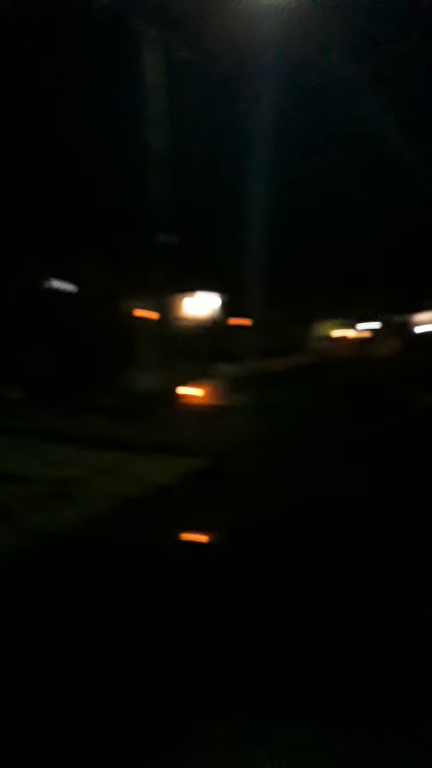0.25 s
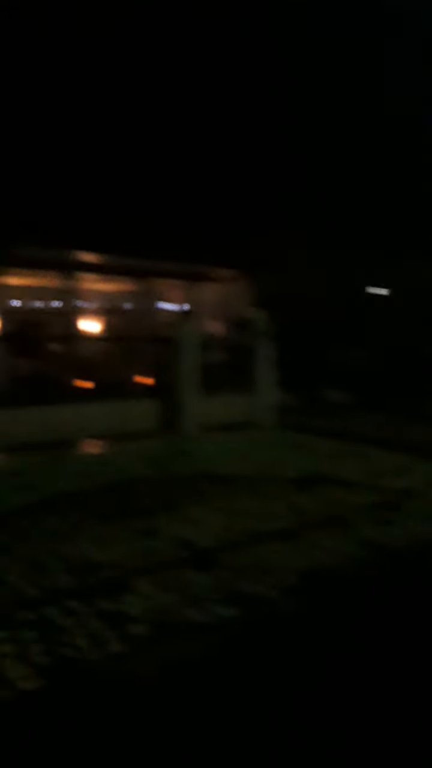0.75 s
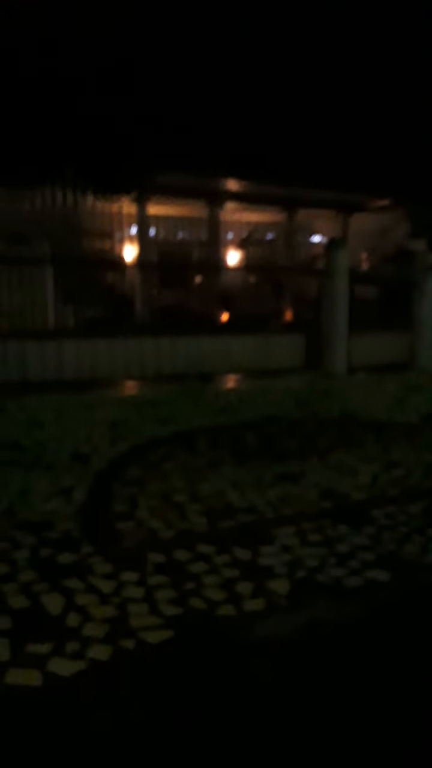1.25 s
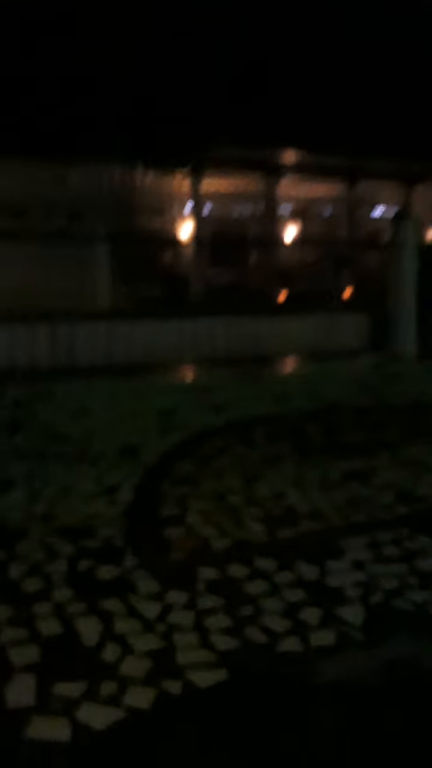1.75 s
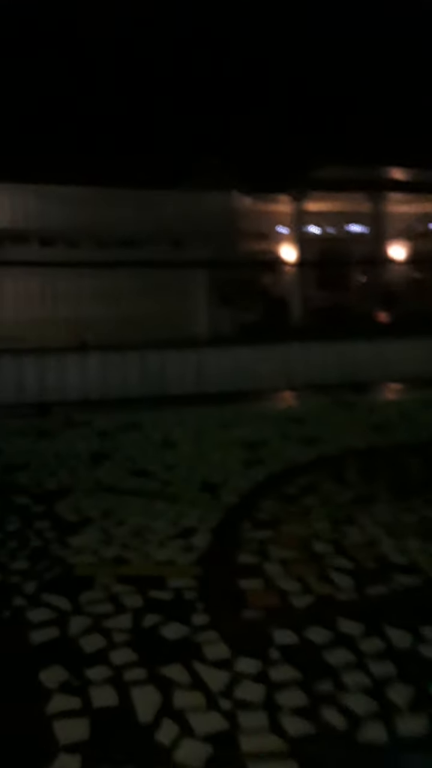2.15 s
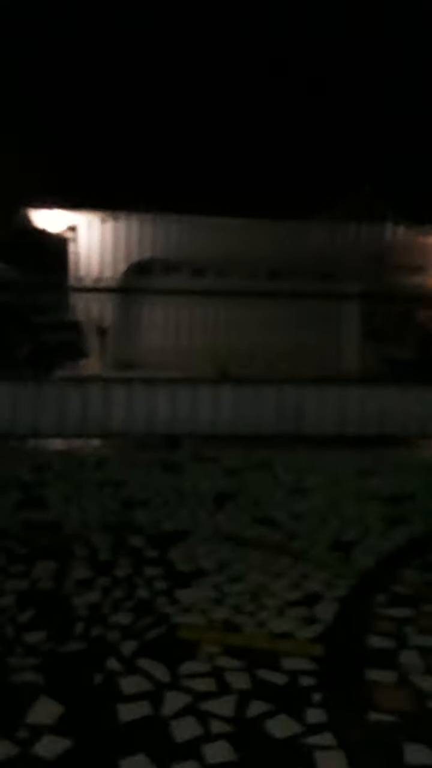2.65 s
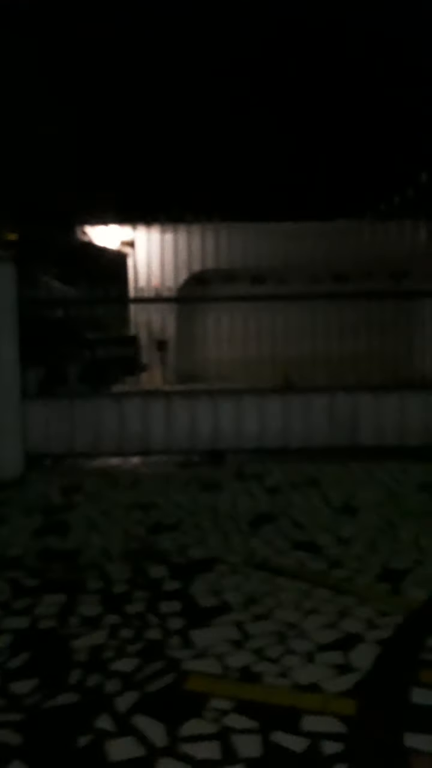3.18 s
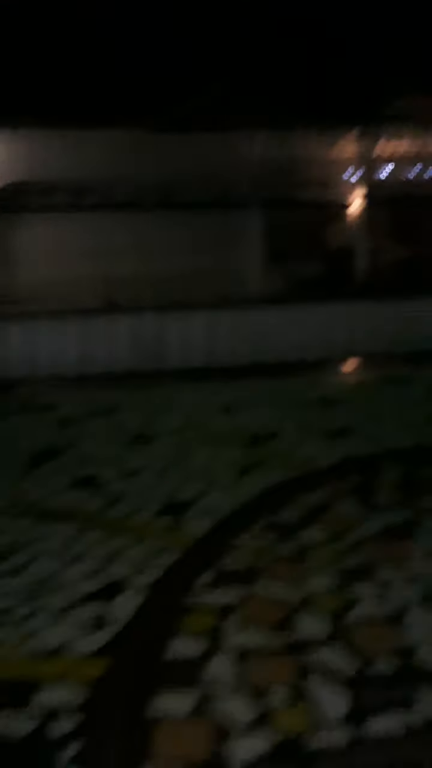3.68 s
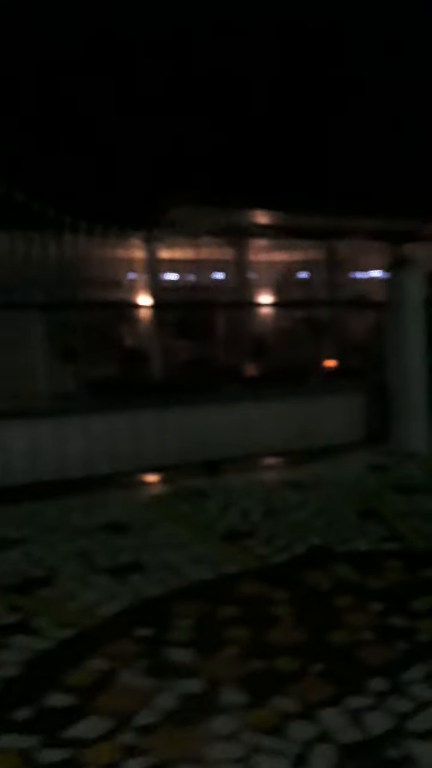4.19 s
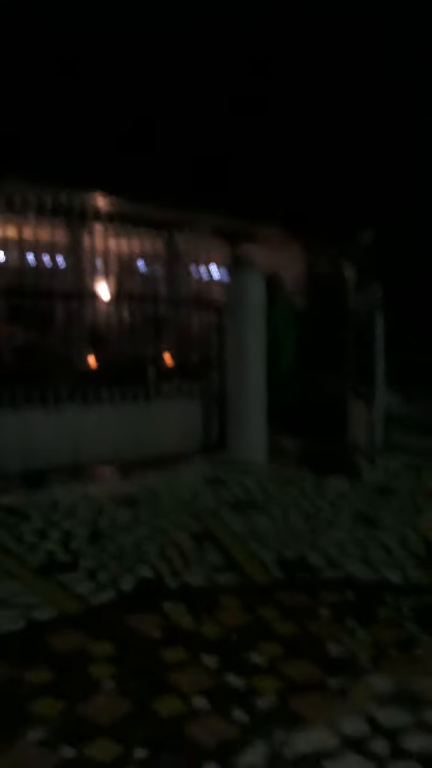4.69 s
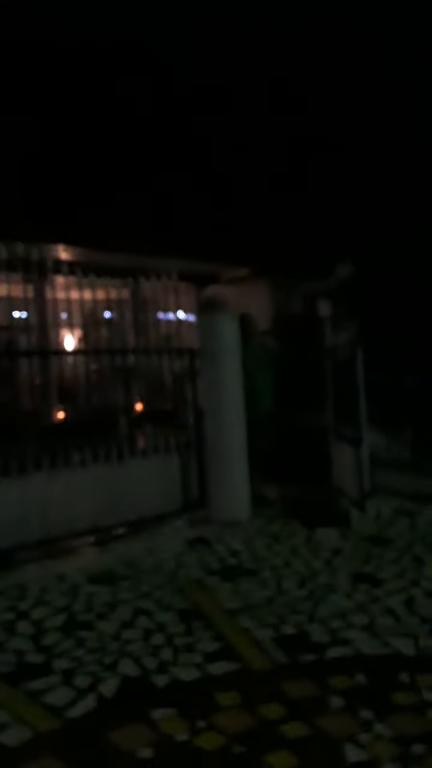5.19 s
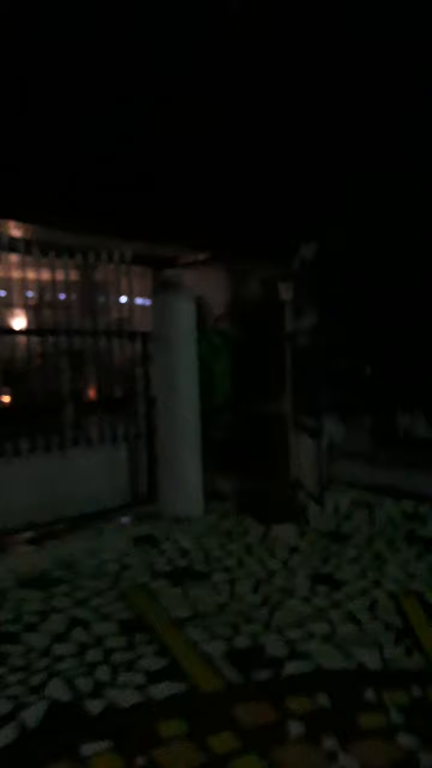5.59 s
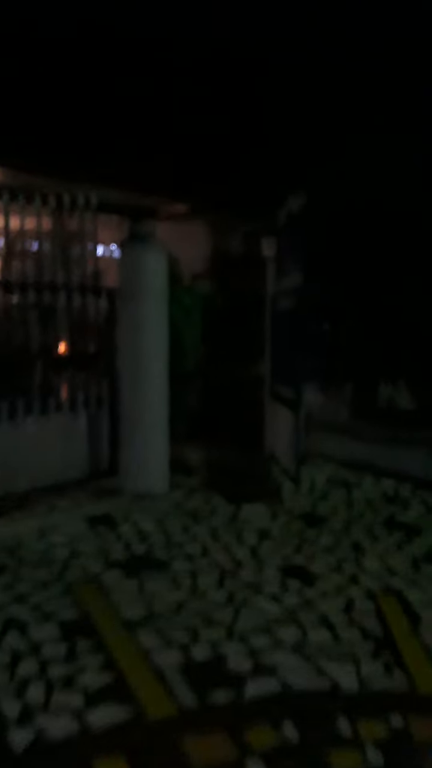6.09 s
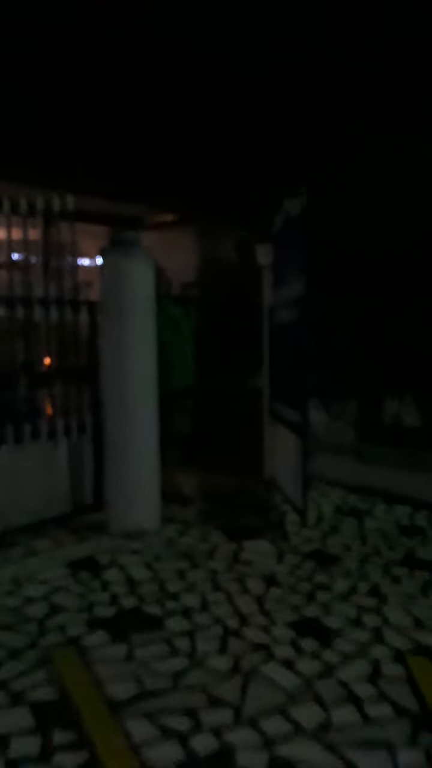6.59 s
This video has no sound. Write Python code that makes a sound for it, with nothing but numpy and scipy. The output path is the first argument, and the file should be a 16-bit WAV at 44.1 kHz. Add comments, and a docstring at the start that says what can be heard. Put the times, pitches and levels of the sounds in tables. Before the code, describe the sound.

Frogs whistle throughout on a paved square at night, several short, high, rising calls a second, often overlapping and sometimes breaking into a peep. Five firecrackers go off down the street at about 0.2, 1.9, 4.0, 4.8 and 6.1 seconds. They are by far the loudest sounds, each a sharp bang with quick slaps off house fronts and an echo fading within about a second; the last two are slightly weaker. Near the phone microphone, grit cracks under shifting shoes and cloth rustles, with brief sole scrapes around 2.5, 4.4 and 5.7 seconds. A faint cricket trills in phrases, other insects buzz very high, and distant traffic hums quietly underneath. A light breeze brushes the microphone now and then, and soft, dull knocks come at about 3.1, 6.0 and 6.5 seconds.

```python
"""A paved square at night, with far traffic humming under everything.
Frogs whistle in rising sweeps. A cricket trills, and a far insect choir and a katydid buzz.
The person holding the phone shifts on gritty stones: grit cracks, soles scrape, cloth rustles.
Firecrackers go off down the street, each a sharp push of air that echoes between the house fronts.
A breeze touches the microphone, and there are a few soft, dull knocks."""
import sys
import numpy as np
from scipy import signal
from scipy.io import wavfile
from scipy.ndimage import uniform_filter1d

SR = 44100
rng = np.random.default_rng(int(sys.argv[2]) if len(sys.argv) > 2 else 0)


def pcm_store(signal):
    """Save signal as 16-bit PCM."""
    levels = np.round(np.clip(np.atleast_2d(signal), -1, 1) * 32767)
    wavfile.write(sys.argv[1], SR, levels.astype(np.int16).T)


N = 301644
TIME = np.arange(N) / SR

# The tone of far traffic. Each row: pitch in Hz, relative strength there in dB.
TRAFFIC_TONE = [(30, -11), (80, 1), (160, 0.5), (500, 1), (900, -0.5), (1400, -7), (3200, -12),
                (5500, -20.5), (8000, -46), (10500, -57), (15000, -35)]
# Cricket phrases. Each row: start in seconds, level in dB.
CRICKET_PHRASES = [(.53, -63), (.87, -80), (1.28, -64), (1.668, -64.5), (2.15, -58), (2.86, -66),
                   (3.28, -63), (3.66, -67), (5.15, -69), (5.5, -62), (5.88, -65), (6.28, -63),
                   (6.7, -58.5)]
# Bouts of crackly hiss: shoes and cloth rustling, and the fizz after the second bang.
# Each row: start in seconds, hold in seconds, level in dB.
CRACKLE_BOUTS = [(-.01, 0.1, -68), (.65, 0.16, -77.5), (1.0, 0.39, -72.5), (1.36, 0.12, -67.5),
                 (1.89, 0.12, -66), (2.465, 0.06, -56), (3.063, 0.17, -65.5), (3.87, 0.12, -66.5),
                 (4.33, 0.08, -76), (4.405, 0.016, -54.5), (4.945, 0.27, -77.5), (5.04, 0.033, -66),
                 (5.61, 0.19, -64), (6.22, 0.16, -63), (6.8, .1, -63.5)]
# The tone of that hiss. Each row: band centre in Hz, width in Hz, relative level in dB.
CRACKLE_BANDS = [(1180, 1160, 8.5), (3520, 3150, 12), (7550, 3300, 5.5), (14300, 3400, -0.5)]
# Frog whistles. Each row: middle of the glide in seconds, seconds from there to the top, level in dB.
FROG_WHISTLES = [(.005, 0.12, -42.5), (.035, 0.14, -45), (.406, 0.097, -39.5), (.45, .1, -44.5),
                 (.713, 0.11, -31.5), (.742, .11, -40.5), (0.765, 0.13, -40), (1.091, 0.091, -34.5),
                 (1.098, 0.089, -38), (1.441, 0.12, -32), (1.467, 0.097, -39), (1.595, 0.096, -49.5),
                 (1.823, 0.095, -39), (2.164, .11, -40), (2.293, 0.1, -45.5), (2.362, .11, -34),
                 (2.431, 0.098, -36), (2.766, 0.099, -38), (2.798, 0.11, -40), (3.092, 0.11, -30.5),
                 (3.113, 0.097, -37), (3.485, 0.11, -39), (3.519, 0.11, -37.5), (3.9, 0.098, -33.5),
                 (4.163, 0.12, -33.5), (4.257, 0.12, -46.5), (4.577, 0.1, -41.5), (4.977, 0.11, -38),
                 (5.112, 0.12, -53), (5.31, 0.092, -41.5), (5.328, 0.081, -45), (5.678, 0.13, -41),
                 (5.949, 0.086, -45.5), (5.976, 0.1, -42), (6.297, 0.092, -37), (6.311, 0.086, -37),
                 (6.551, 0.11, -35.5), (6.793, 0.095, -42), (6.815, 0.096, -41)]
# Short high notes that some whistles break into. Each row: start in seconds, level in dB.
FROG_PEEPS = [(1.522, -42), (2.4473, -44), (3.184, -46), (4.247, -46), (5.067, -45)]
# Grit cracking under shoes. Each row: start in seconds, peak in dB, band centre in Hz.
GRIT_CRACKS = [(0.0187, -28.5, 3560), (.045, -39, 11000), (0.0747, -34, 9000), (0.6562, -32, 3450),
               (.7174, -42, 12500), (0.835, -30.5, 1630), (1.0989, -32, 2550), (1.2245, -34.5, 4150),
               (1.3676, -29, 3120), (1.394, -25.5, 3700), (1.482, -28.5, 6400), (1.5201, -24, 3150),
               (1.924, -33, 12500), (2.0525, -31, 3980), (2.177, -33, 5000), (2.409, -50, 10000),
               (2.4723, -33, 4500), (3.218, -26, 3100), (3.8741, -31, 3500), (4.333, -47, 11500),
               (4.4812, -27, 4260), (5.052, -32.5, 6000), (5.094, -33.5, 8000), (5.347, -50, 8500),
               (5.5745, -48, 12000), (5.7583, -36, 3420), (5.8985, -46, 9000), (6.2226, -24, 6450),
               (6.266, -24, 3740), (6.322, -24.5, 3340)]
# Soles scraping. Each row: start in seconds, length in seconds, level in dB, band centre in Hz.
SOLE_SCRAPES = [(0.082, 0.017, -33.5, 2140), (2.499, 0.051, -38.5, 3300), (3.134, 0.037, -46, 6900),
                (3.868, 0.046, -44.5, 3350), (4.418, 0.019, -28, 2760), (5.661, 0.014, -37.5, 3720),
                (5.674, 0.026, -28.5, 4630), (5.692, 0.046, -36, 3640)]
# Firecrackers. Each row: start in seconds, shock level in dB, suction depth from 0 to 1,
# shock length in milliseconds, paper crack level in dB, its centre in Hz, street roar level in dB,
# roar tilt in dB per octave, seconds until the near house front answers, seconds until the far one does.
FIRECRACKERS = [(.2326, -1.2, .55, 1.55, -7, 4000, -35, -1.5, .039, .062),
                (1.8989, -.3, .8, 1.15, -20, 6500, -32.5, 1.2, .034, .063),
                (4.0091, -1.5, .5, 1.05, -13, 7400, -34, 0, .032, .061),
                (4.796, -4.5, .55, 1.45, -15, 5300, -35.5, 0, .029, .06),
                (6.1025, -4.6, .6, 1.3, -19, 7000, -35, .8, .029, .056)]
# The street's roar. Each row: band centre in Hz, relative level in dB, seconds to fade by 60 dB.
ROAR_BANDS = [(188.2, -6, 1), (418, -2.5, 1.27), (910, -4, 1.33), (2095, -4, 0.98), (5530, -19, 0.97)]
# Echoes off the near and the far house front.
# Each row: seconds after that front answers, dB above the roar level, pitch in Hz.
NEAR_ECHOES = [(-.007, 4, 600), (.0005, 15, 457)]
FAR_ECHOES = [(.0005, 15, 620), (.007, 14, 450), (.021, 13, 700)]
# Katydid songs. Each row: start in seconds, end in seconds, level in dB.
KATYDID_SONGS = [(0.985, 1.589, -62), (2.07, 2.45, -68), (2.707, 3.33, -55), (4.636, 4.852, -56),
                 (6.194, 6.65, -53)]
# Gusts of breeze. Each row: start in seconds, end in seconds, level in dB.
GUSTS = [(1.22, 1.55, -52.5), (3.15, 3.8, -59), (4.2, 4.68, -53), (6.4, 6.9, -55.5)]
# Soft, dull knocks. Each row: start in seconds, level in dB, pitch in Hz.
DULL_KNOCKS = [(3.111, -38.5, 322), (5.973, -37, 305), (6.515, -31.5, 101)]


def from_db(db):
    """Turn decibels into a number to multiply by."""
    return 10 ** (np.asarray(db) / 20)


def unit_level(x):
    """Scale a sound to an average (rms) level of 1."""
    return x / np.sqrt(np.mean(x ** 2))


def band(x, hz, width):
    """Keep the pitches around hz, in a band width Hz wide."""
    low = np.sqrt(hz ** 2 + width ** 2 / 4) - width / 2
    return keep_between(x, low, min(low + width, .45 * SR), order=2)


def keep_between(x, low_hz, high_hz, order):
    """Keep the pitches between two edges; a higher order cuts more steeply."""
    return signal.sosfilt(signal.butter(order, [low_hz, high_hz], "band", fs=SR, output="sos"), x)


def hiss(hz, width, size=N):
    """A band of noise at level 1."""
    return unit_level(band(rng.standard_normal(size), hz, width))


def wander(rate):
    """A smooth random wobble, roughly -1 to 1, with rate new values a second."""
    hold = int(SR / rate)
    steps = np.repeat(rng.standard_normal(N // hold + 1), hold)
    return uniform_filter1d(uniform_filter1d(steps, hold), hold)[:N]


def add(out, start, x):
    """Mix x into out from start seconds on."""
    i = int(round(start * SR))
    a, b = max(i, 0), max(min(i + len(x), N), 0)
    out[a:b] += x[a - i:b - i]


def swells(rows, fade_s):
    """A volume curve that fades in and out for each (start, end, dB) row."""
    return sum(from_db(db) * np.clip(np.minimum(TIME - start, end - TIME) / fade_s, 0, 1)
               for start, end, db in rows)


def traffic():
    """Far traffic: bands of noise half an octave apart, each wavering on its own."""
    tone_hz, tone_db = np.transpose(TRAFFIC_TONE)
    out = 0
    for hz in 30 * 2 ** np.arange(0, 9.1, .5):
        db = np.interp(np.log(hz), np.log(tone_hz), tone_db)
        db += 10 * np.log10(hz)  # wider bands hold more power
        out = out + from_db(db + wander(4.75)) * hiss(hz, hz / 3)
    return from_db(-90) * out


def cricket(trill_hz=55, phrase_s=.2):
    """A narrow, trilling hiss that swells in phrases and goes on faintly between them."""
    trill_phase = 2 * np.pi * np.cumsum(trill_hz * (1 + .093 * wander(5))) / SR
    phrases = [(start, start + phrase_s, db) for start, db in CRICKET_PHRASES]
    volume = swells(phrases, fade_s=.034) + from_db(-71)
    return hiss(4290, 210) * (1 + .29 * np.sin(trill_phase)) * volume


def insect_choir(stroke_hz=200, loudest_s=2.55):
    """Far insects swell once. Their even wing strokes put closely spaced tones into a high hiss."""
    phase = 2 * np.pi * np.cumsum(stroke_hz * (1 + .004 * wander(1.5))) / SR
    buzz = unit_level(sum(from_db(4 * wander(6)) * np.cos(k * phase) for k in range(35, 40)))
    volume = from_db(-64.5 + 4 * np.exp(-(TIME - loudest_s) ** 2))
    return volume * (.8 * hiss(7350, 1300) + .65 * buzz)


def bout_volume(fade_s):
    """A volume curve that jumps up, holds and fades with each bout of crackly hiss."""
    volume = 0
    for start, hold, db in CRACKLE_BOUTS:
        onset = np.clip((TIME - start) / .0069, 0, 1)
        volume = volume + from_db(db) * onset * np.exp(-np.maximum(TIME - start - hold, 0) / fade_s)
    return volume


def crackly_hiss():
    """Tiny clicks and hiss that fade and settle: shoes, cloth, and the fizz after the second bang."""
    crackle = np.zeros(N)
    for hz, width, db in CRACKLE_BANDS:
        flicker = from_db(2.5 * wander(70))
        clicks = rng.standard_normal(N) * (rng.random(N) < .012)
        clicks *= from_db(2.4 * rng.exponential(size=N))  # a few stand out
        grains = unit_level(clicks) + .6 * rng.standard_normal(N)
        crackle += from_db(db) * flicker * unit_level(band(grains, hz, width))
    settling = from_db(-25.5) * bout_volume(fade_s=.57)
    return crackle * (bout_volume(fade_s=.051) + settling + from_db(-86))


def whistle(rise_s, stop_s, sharp_hz, middle_hz=2032, top_hz=2823):
    """One frog call: a pure tone glides up, levels off and stops short. Its middle is 0.1 s in."""
    t = np.arange(-.1 * SR, (stop_s + .03) * SR) / SR
    progress = np.clip(t / rise_s, -1, 1.2)
    glide = np.where(progress > 0, np.sin(np.pi / 2 * progress), np.pi / 2 * progress)
    hz = middle_hz + (top_hz + sharp_hz - middle_hz) * glide
    age = t + .026 + 1.07 * (rise_s - .095)  # slower glides start earlier
    swell_db = -16 * np.clip(1 - age / .08, 0, 1) ** 2.22 - 700 * np.clip(-age, 0, 1)
    ending_db = -4 * np.clip(t / stop_s, 0, 1) ** 4 - 1400 * np.clip(t - stop_s, 0, 1)
    return np.sqrt(2) * from_db(swell_db + ending_db) * np.sin(2 * np.pi * np.cumsum(hz) / SR)


def wall_echoes(x, fade_s, delay_s):
    """Walls and fences send back a swarm of echoes that drops 60 dB in fade_s."""
    t = np.arange(SR) / SR
    swarm = rng.standard_normal(SR) * from_db(-60 * t / fade_s) * (t > delay_s)
    return signal.fftconvolve(x, swarm / np.sqrt(np.sum(swarm ** 2)))[:N]


def frogs(peep_hz=3314, peep_fall_hz_per_s=5300):
    """Near frogs whistle and peep with a slight flutter; a far crowd is heard only as echoes."""
    near, far = np.zeros(N), np.zeros(N)
    for middle, rise_s, db in FROG_WHISTLES:
        until_peeps = [start - middle for start, _ in FROG_PEEPS if start - middle > .075]
        stop_s = min([.1] + until_peeps)  # a peep can cut the whistle short
        add(near, middle - .1, from_db(db) * whistle(rise_s, stop_s, 20 * rng.standard_normal()))
    t = np.arange(.05 * SR) / SR
    peep_shape = np.clip(np.minimum(t, .036 - t) / .0047, 0, 1) * from_db(-150 * t)
    peep = peep_shape * np.sin(2 * np.pi * (peep_hz - peep_fall_hz_per_s * t / 2) * t)
    for start, db in FROG_PEEPS:
        add(near, start, from_db(db) * peep)
    for when, faintness, slowness in rng.random((90, 3)):
        call = whistle(.11 + .02936 * slowness, stop_s=.14, sharp_hz=160 * (faintness - .6))
        add(far, when * N / SR - .1, from_db(-8 * faintness) * call)
    near *= from_db(2.4 * wander(110))
    echoes = from_db(-12) * wall_echoes(near, fade_s=.55, delay_s=.0044)
    return near + echoes + from_db(-53) * wall_echoes(far, fade_s=.76, delay_s=0)


def grit():
    """Single grains crack under a shoe, each a tiny burst of noise."""
    out, t = np.zeros(N), np.arange(300) / SR
    for start, db, hz in GRIT_CRACKS:
        crack = band(rng.standard_normal(len(t)) * np.exp(-t / .0011), hz, .8 * hz)
        add(out, start, from_db(db) * crack / abs(crack).max())
    return out


def scrapes():
    """Soles slide over the stones: short hisses made crunchy by a fast flicker."""
    out = np.zeros(N)
    for start, length, db, hz in SOLE_SCRAPES:
        size = int(length * SR)
        shape = np.sin(np.pi * np.sqrt(np.arange(size) / size))
        add(out, start, from_db(db) * hiss(hz, .84 * hz, size) * shape)
    return out * from_db(2.3 * wander(290))


def shock(depth, length_ms):
    """A short push of air, a longer suction that snaps back, and the same again off the ground."""
    ms = np.arange(900) / SR * 1000
    corners_ms = [0, .2, .28, .45, .8 * length_ms, length_ms]
    direct = np.interp(ms, corners_ms, [0, 1, .8, -.4 * depth, -depth, 0])
    ground = .25 * np.interp(ms - .42, ms, direct, left=0)
    wave = keep_between(direct + ground, 110, 6500, order=2)
    return wave / wave.max()


def street_roar(tilt_db, near_s):
    """Kerbs answer a bang at once, the near house front adds a burst, and the street rings on."""
    t = np.arange(int(1.3 * SR)) / SR
    kerbs = 2 * np.exp(-t / .0038)
    burst = from_db(1.5) * np.exp(-((t - near_s) / .0041) ** 2)
    roar = np.zeros(len(t))
    for hz, db, fade_s in ROAR_BANDS:
        shape = (1 + burst) * from_db(-60 * t / fade_s) + kerbs
        roar += from_db(db + tilt_db * np.log2(hz / 500)) * hiss(hz, hz, len(t)) * shape
    return keep_between(roar, 110, 8800, order=3)


def firecrackers():
    """Each bang is a shock, a crack of paper, a roar in clumps of echoes and slaps off the houses."""
    out, t = np.zeros(N), np.arange(800) / SR
    clumps = from_db(3.2 * wander(110))
    for start, db, depth, length_ms, crack_db, crack_hz, roar_db, tilt_db, near_s, far_s in FIRECRACKERS:
        add(out, start, from_db(db) * shock(depth, length_ms))
        paper = hiss(crack_hz, 2670, size=600) * np.exp(-t[:600] / .00055)
        add(out, start, from_db(crack_db) * paper)
        roar = street_roar(tilt_db, near_s)
        roar *= clumps[int(start * SR / 2):][:len(roar)]  # each bang clumps in its own way
        add(out, start + .001103, from_db(roar_db) * roar)
        for front_s, echoes in ((near_s, NEAR_ECHOES), (far_s, FAR_ECHOES)):
            for lag, slap_db, hz in echoes:
                slap = np.sin(2 * np.pi * hz * t) * np.exp(-t * hz / 1.3)
                add(out, start + front_s + lag, from_db(roar_db + slap_db) * slap)
    return keep_between(out, 55, 8800, order=4)


def katydid(fade_db_per_s=30):
    """A very high, rough buzz that weakens through each song."""
    volume = sum(swells([(start, end, db)], fade_s=.089) * from_db(-fade_db_per_s * (TIME - start))
                 for start, end, db in KATYDID_SONGS)
    return hiss(13200, 2300) * from_db(.82 * wander(140)) * volume


def breeze():
    """Gusts brush the microphone and make a low, uneven rumble."""
    rumble = hiss(69.4, 39) + .49 * hiss(130, 107)
    return rumble * swells(GUSTS, fade_s=.038) * from_db(2 * wander(8.3))


def knocks():
    """Each knock is a low tone that swells and dies within a few cycles."""
    out, t = np.zeros(N), np.arange(.1 * SR) / SR
    shape = t / .0096 * np.exp(1 - t / .0064)
    for start, db, hz in DULL_KNOCKS:
        add(out, start, from_db(db) * np.sin(2 * np.pi * hz * t) * shape)
    return out


def scene():
    """Add all the sounds of the square into one channel."""
    insects = cricket() + insect_choir() + katydid()
    crunches = crackly_hiss() + grit() + scrapes()
    return (traffic() + insects + crunches + frogs() + firecrackers() + breeze() + knocks())[None]


def record(dry, bass_hz=55, top_hz=15900):
    """The phone drops the deepest bass and cuts the highest treble."""
    x = signal.sosfilt(signal.butter(3, bass_hz, "high", fs=SR, output="sos"), dry)
    return signal.sosfilt(signal.ellip(10, .2, 60, top_hz, fs=SR, output="sos"), x)


dry = scene()
out = record(dry)
pcm_store(out)
```